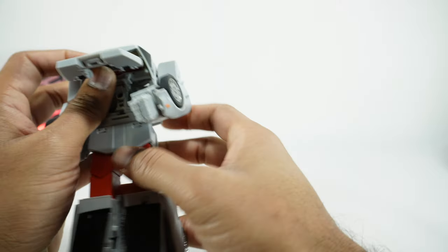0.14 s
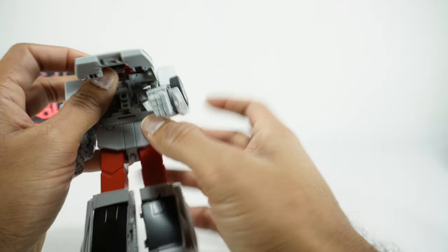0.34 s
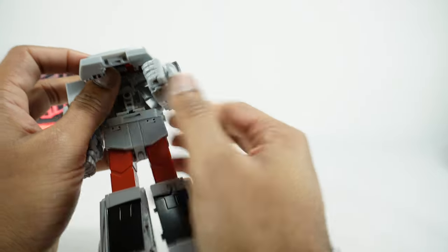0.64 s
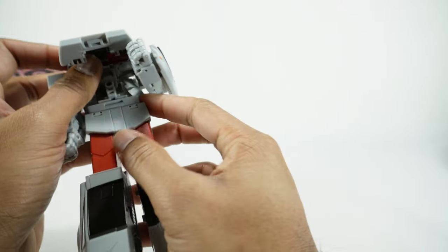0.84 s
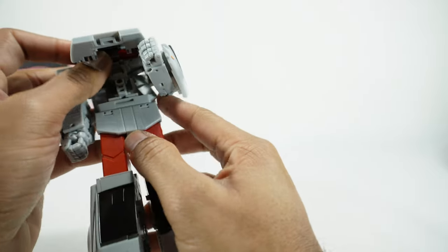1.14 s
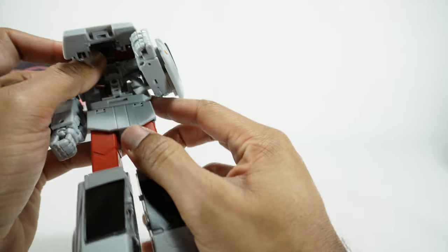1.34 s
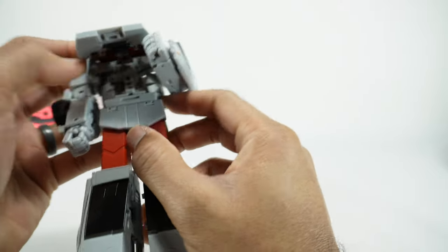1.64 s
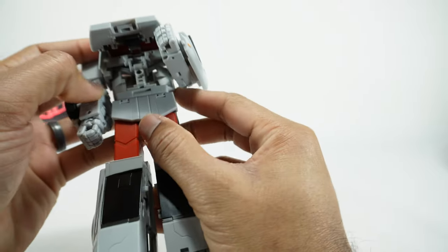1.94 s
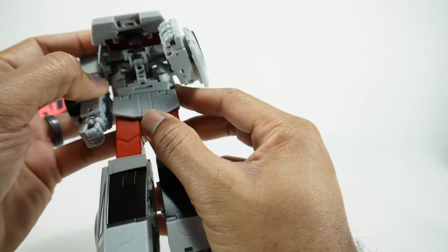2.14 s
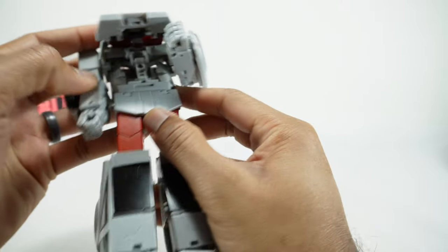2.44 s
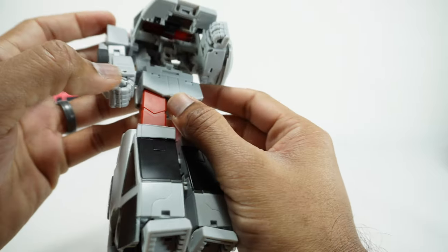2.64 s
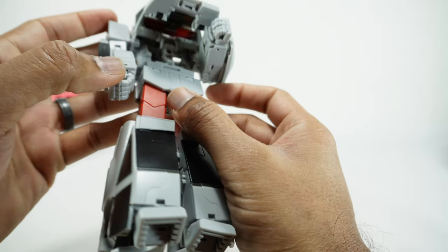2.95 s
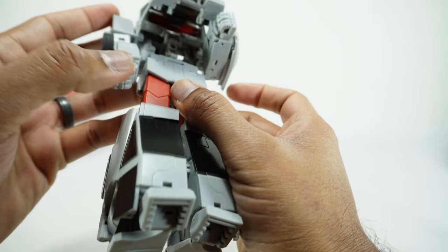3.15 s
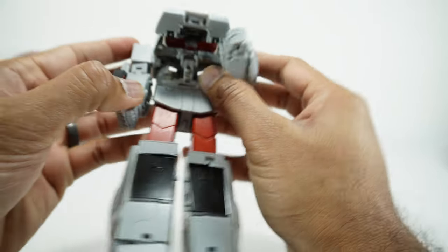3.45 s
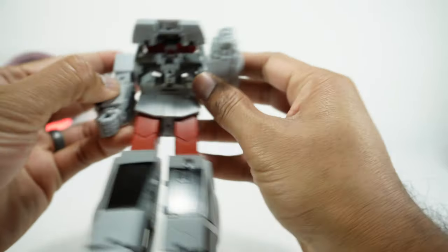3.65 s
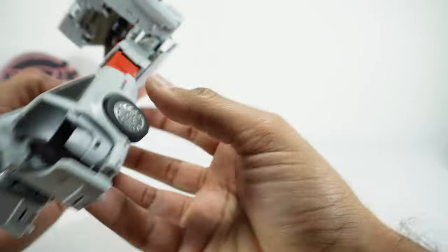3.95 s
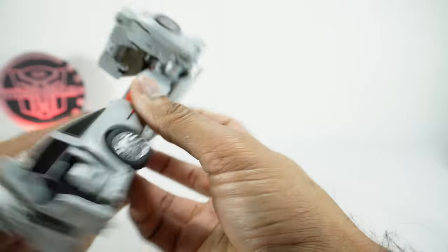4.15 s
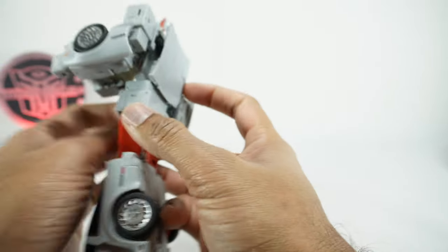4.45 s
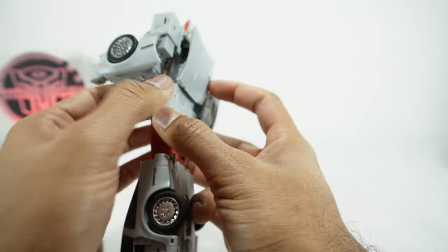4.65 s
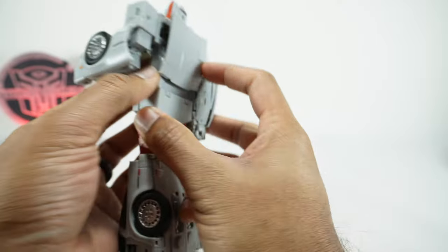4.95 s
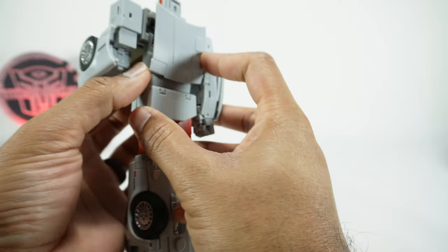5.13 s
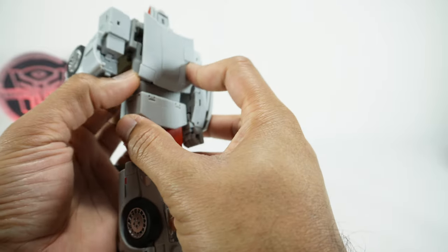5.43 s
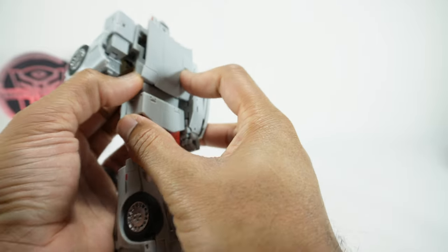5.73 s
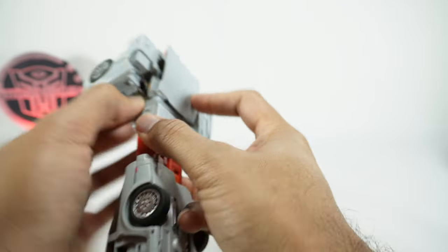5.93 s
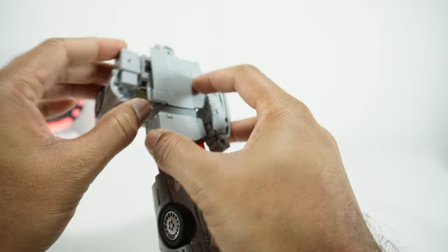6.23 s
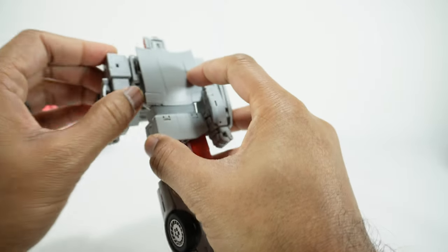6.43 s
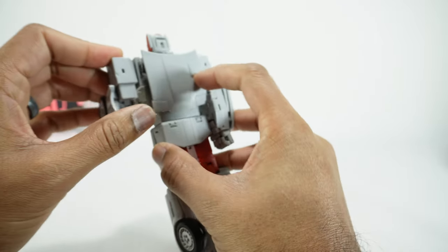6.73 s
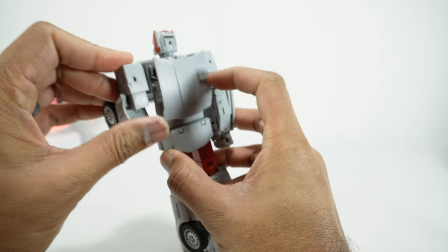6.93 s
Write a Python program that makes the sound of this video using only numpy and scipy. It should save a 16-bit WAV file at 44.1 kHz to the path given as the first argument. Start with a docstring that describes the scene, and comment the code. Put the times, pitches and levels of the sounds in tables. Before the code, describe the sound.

A hard hollow plastic toy is folded by hand, very close to the microphone in a small still room with a soft steady hush. A few light clicks come in the first 0.4 s, then a bright, dense chatter of snaps and scrapes from 0.57 to 1.0 s. It falls quiet, with small clicks around 1.45 and 1.8 s. Between 2.07 and 2.36 s five tiny ratchet ticks sound, then faint handling. A duller knock and scrape arrive at 3.5 s; rapid clicks gather at 3.9 s and culminate in the loudest hard snap at 4.13 s, with more clacks until 4.35 s. One crisp click stands out at 4.83 s. Afterwards come only sparse faint ticks, with thin bright clicks near 5.97 and 6.17 s. Soft skin rubbing and low hand rumble follow the effort throughout. A dull low bump lands at 7.0 s.

```python
"""Folding a hard plastic toy figure

Two hands fold the figure close to a microphone in a small room. Tabs and joints snap, chatter and slide:
each contact is an impulse or stick-slip noise, filtered by the hollow shell and the touched part's own note.
A small ratchet ticks as decaying sines. The effort of the hands drives noise for rubbing and rumble, and
the ticking of loose parts; low damped modes make a dull bump at the end, over the hush of the room."""
import sys
import numpy as np
from scipy import signal
from scipy.fft import rfft, irfft
from scipy.io import wavfile
from scipy.ndimage import uniform_filter1d

SR = 44100
rng = np.random.default_rng(int(sys.argv[2]) if len(sys.argv) > 2 else 0)


def int16_out(signal):
    """Quantize to a 16-bit WAV file."""
    q = np.round(np.clip(np.atleast_2d(signal).T, -1, 1) * 32767)
    wavfile.write(sys.argv[1], SR, q.astype(np.int16))


N = 312436
TIME = np.arange(N) / SR


def amp(db):
    """Decibel law: level to amplitude gain."""
    return 10 ** (np.asarray(db) / 20)


def unit(x):
    """Normalisation of the mean power: scales to rms 1."""
    return x / np.sqrt(np.mean(x ** 2) + 1e-20)


def read(points, hz):
    """Linear interpolation of a table on a log-frequency axis."""
    f, value = np.transpose(points)
    return np.interp(np.log(hz + 1), np.log(f + 1), value)


def add(mix, s, sound):
    """Superposition: mixes a sound into the stereo mix at time s."""
    part = mix[:, max(round(s * SR), 0):][:, :sound.shape[1]]
    part += sound[:, :part.shape[1]]


def colour(x, points):
    """Zero-phase filtering: weights the spectrum by a table of f/Hz, level/dB."""
    hz = np.fft.rfftfreq(x.shape[-1], 1 / SR)
    return irfft(rfft(x) * amp(read(points, hz)), x.shape[-1])


def causal(gain):
    """Minimum phase: the response with this gain that is silent before the blow."""
    log_gain = np.log(gain + 1e-9)
    circle = np.concatenate([log_gain, log_gain[-2:0:-1]])
    return np.exp(np.conj(signal.hilbert(circle)))[:len(gain)]


def spread(mid, side, width_db, corner_hz=4800):
    """Spatial coherence: two close capsules are alike in the bass, further apart for short waves."""
    hz = np.fft.rfftfreq(len(mid), 1 / SR)
    width = amp(width_db) * np.minimum((hz / corner_hz) ** 1.3, 1.45)
    apart = irfft(rfft(side) * width, len(mid))
    return np.array([mid + apart, mid - apart])


# broad spectrum that the shell radiates, weak below its first modes: f/Hz, relative level/dB
SHELL_SPECTRUM = [(60, -45.5), (480, -17), (750, -20), (1050, -11), (1450, -7.5), (1780, 3.5), (2250, 2.5),
                  (3100, 5.5), (4400, 1.5), (6200, -2.5), (8200, -7), (9800, -19), (12500, -27.5),
                  (16000, -43)]


def radiated(hz, tilt_db, note_hz, note_db, pivot_hz=4000, lowest_hz=1500, highest_hz=10500, note_share=0.095):
    """Source-filter principle: shell spectrum, tilted by contact hardness, plus the part's resonance."""
    tilt = tilt_db * np.log2(np.clip(hz, lowest_hz, highest_hz) / pivot_hz)  # dB per octave
    note = note_db / (1 + ((hz / note_hz - 1) / note_share) ** 2)
    return amp(read(SHELL_SPECTRUM, hz) + tilt + note)


# modes of the shell, shared by every contact: f/Hz, relative level/dB
SHELL_MODES = [(1760, -3.5), (2070, -2), (2250, -1.5), (2670, -9), (2820, -21.5), (3210, 1), (3500, -4.5),
               (3930, -4), (4515, -0.5), (5570, -2.5), (7860, -6)]


def shell_ring(t, modes_db=-12, crack_db=5, crack_t60=0.012, dense_t60=0.1,
               mode_t60=0.065, mode_hz=2200, scatter_db=4, detune_share=0.0099):
    """Modal superposition: a crack, a dense ring of small parts, and main modes struck at a random spot."""
    hz, db = np.transpose(SHELL_MODES)[:, :, None]
    weight, phase, detune = rng.standard_normal((3, len(hz), 1))
    hz = hz * (1 + detune_share * detune)  # the modes shift as the grip changes
    t60 = mode_t60 * np.sqrt(mode_hz / hz)  # plastic damps high modes sooner
    decay = amp(db + scatter_db * weight - 60 * t / t60)
    modes = decay * np.sin(2 * np.pi * (hz * t + phase))
    crack = amp(crack_db - 60 * t / crack_t60)
    dense = .5 * amp(-60 * t / dense_t60)
    return rng.standard_normal(len(t)) * (crack + dense) + amp(modes_db) * modes.sum(0)


def click(db, tilt_db, note_hz, note_db, chatter_s, size=4096, slips_per_s=2500, first_s=0.0047,
          dispersion=0.0702, slip_db=2, fade_s=0.0084, kept=0.41):
    """Impulse excitation: a snap, or a quick swelling run of tiny slips, rings the shell."""
    t, hz = np.arange(size) / SR, np.fft.rfftfreq(size, 1 / SR)
    swell = np.sin(np.pi * np.minimum(t / (chatter_s + 1e-9), 1))
    slips = amp(slip_db) * swell * rng.standard_normal(size) * (rng.random(size) < slips_per_s / SR)
    slips[0] = 1
    rings = np.array([shell_ring(t), shell_ring(t)])  # mid, side
    rings[0, 0] += abs(rings[0]).max()  # the first wavefront reaches both capsules alike
    blow = rfft(signal.fftconvolve(rings, slips[None], axes=1)[:, :size])
    # flatten, so that the shell sets the broad colour
    blow /= np.sqrt(uniform_filter1d(abs(blow[0]) ** 2, size=70) + 1e-12)
    # bending waves: the treble crosses the shell first
    blow *= np.exp(-2j * np.pi * dispersion * np.sqrt(hz))
    early = irfft(blow * causal(radiated(hz, tilt_db, note_hz, note_db)))
    late = irfft(blow * causal(radiated(hz, kept * tilt_db, note_hz, kept * note_db)))
    # the struck part's own colour soon gives way to the shell's
    local = np.exp(-(np.maximum(t - chatter_s, 0) / fade_s) ** 2)
    ending = np.cos(np.pi / 2 * np.minimum(t / t[-1], 1)) ** 2  # the last of the ring fades smoothly to silence
    mid, side = ending * (local * early + (1 - local) * late)
    attack_rms = np.sqrt(np.mean(mid[t < first_s + chatter_s] ** 2))
    return amp(db) / attack_rms * spread(mid, side, width_db=-13.0)


# the parts that get touched: f/Hz of the own note, its peak level/dB above the shell spectrum
LEG = (1340, 8.4)
BODY = (2080, 2.9)
PANEL = (2285, 16.5)
CHEST = (2600, 9.2)
FLAP = (3020, 13.4)
HINGE = (3190, 4.6)
JOINT = (3146, 15.2)
ARM = (4200, 17.2)
PEG = (4560, 11.6)
TAB = (6120, 17.5)
PIN = (7250, 10.4)
LATCH = (13700, 19)
# parts snapping home or knocking together:
# t/s, relative level/dB, brightness/dB per octave, part, chatter length/s
CONTACTS = [ (0.085, -44.5, 4, PEG, 0.0011), (0.1159, -36.5, 0, JOINT, 0),
            (0.1774, -51.5, 1.5, BODY, 0.002), (0.3793, -46.5, 6.5, HINGE, 0),
            (0.3905, -45, 0, BODY, 0.0065), (0.5757, -29.5, 9, PIN, 0.0013),
            (0.585, -31.5, 13.5, HINGE, 0.0025), (0.5885, -35, -2, CHEST, 0.0059),
            (0.601, -35.5, 21, PIN, 0.001), (0.6093, -26.5, 4, HINGE, 0.0036),
            (0.67, -35.5, 1.5, PIN, 0.0053), (0.675, -34, 10, HINGE, 0.0028),
            (0.7055, -28.5, 8.5, JOINT, 0.00025), (0.7078, -31, 8, HINGE, 0.003),
            (0.7265, -30, 4.5, PIN, 0), (0.7533, -35, -7, FLAP, 0), (0.834, -39.5, -2, FLAP, 0),
            (0.862, -39.5, 0.5, BODY, 0.00081), (0.955, -38, 7, PEG, 0.0079),
            (0.9674, -36, 10, HINGE, 0.0037), (0.978, -38, 6, HINGE, 0.005),
            (1.4395, -40.5, -1.5, PEG, 0.0029), (1.4417, -35.5, 2.5, BODY, 0.0018),
            (1.4536, -42, 4, JOINT, 0), (1.495, -46, 0.5, PEG, 0.0042), (1.581, -53, -4.5, BODY, 0.0033),
            (1.791, -49, -0.5, JOINT, 0.01), (1.817, -40, 5.5, FLAP, 0.00019),
            (2.0742, -50, 1, HINGE, 0.00079), (2.597, -50.5, -3.5, CHEST, 0.002),
            (2.65, -43, -2, FLAP, 0.0028), (3.227, -51.5, 1.5, BODY, 0.0035),
            (3.348, -44.5, 4, FLAP, 0.016), (3.432, -47.5, 8, PANEL, 0.0062),
            (3.5061, -32, -9, BODY, 0.00043), (3.51, -32, -5, BODY, 0.003), (3.519, -33, -4, PANEL, 0.0058),
            (3.5324, -32, 10, FLAP, 0), (3.561, -45, -14, BODY, 0.0014), (3.693, -44, 2.5, HINGE, 0.0025),
            (3.734, -48.5, 0.5, BODY, 0.012), (3.7558, -40.5, 3, HINGE, 0.008),
            (3.7853, -33.5, 1, PANEL, 0.0044), (3.901, -25.5, 2.5, JOINT, 0.0025),
            (3.916, -30.5, 0, HINGE, 0.0083), (3.9337, -28, 1.5, HINGE, 0.00044),
            (3.943, -27, 5.5, PEG, 0.0051), (3.957, -26, 5, PEG, 0.0036), (3.9626, -25, 3, PEG, 0),
            (4.0966, -37, 1, HINGE, 0.008), (4.1074, -26, 1, HINGE, 0), (4.1276, -24.5, -2.5, HINGE, 0),
            (4.1336, -14.5, 4.5, CHEST, 0), (4.14, -19.5, 1, CHEST, 0.0017),
            (4.1474, -22.5, -3, PANEL, 0.0015), (4.2578, -21.5, 3, FLAP, 0.00097),
            (4.261, -24, 0, PANEL, 0.0019), (4.299, -30, 0, HINGE, 0.0036),
            (4.306, -29, 2.5, JOINT, 0.0026), (4.3159, -30, 0, HINGE, 0.00061),
            (4.321, -27, 2, PEG, 0.0051), (4.358, -39.5, 0.5, BODY, 0.00022),
            (4.4215, -42.5, -6.5, HINGE, 0.00082), (4.574, -40.5, 1.5, HINGE, 0.0033),
            (4.7382, -40.5, 0.5, PEG, 0), (4.747, -39.5, 3.5, HINGE, 0.00095),
            (4.7756, -44, 1.5, PEG, 0.008), (4.8273, -27.5, 2.5, TAB, 0), (4.878, -44.5, 5, JOINT, 0.0039),
            (4.902, -50.5, 3, PANEL, 0.0056), (4.987, -51.5, -1.5, HINGE, 0.0013),
            (5.44, -45.5, -2, HINGE, 0.005), (5.501, -50, -2.5, BODY, 0.012),
            (5.5578, -49, -7, BODY, 0.0007), (5.6015, -44.5, -1.5, BODY, 0.0043),
            (5.7735, -54, -3.5, FLAP, 0.00068), (5.858, -51.5, -2, HINGE, 0.006),
            (5.9424, -45.5, 8, PEG, 0), (5.973, -38.5, 10, LATCH, 0.0037), (6.082, -52.5, 4, PEG, 0.0052),
            (6.1642, -36.5, 12.5, JOINT, 0), (6.176, -34.5, 2, LATCH, 0.0022),
            (6.2294, -46.5, -0.5, PEG, 0.0012), (6.315, -52.5, 2, JOINT, 0.0037),
            (6.379, -49, 4, PEG, 0.01), (6.591, -53.5, -3.5, BODY, 0.008), (6.683, -48, -5, ARM, 0.0088),
            (6.706, -49.5, -6.5, ARM, 0.014), (6.9474, -44, -4.5, BODY, 0.0072)]


def clicks(gain_db=0.5):
    """Impact sound: the clear contacts of the parts."""
    out = np.zeros((2, N))
    for s, db, tilt_db, part, chatter_s in CONTACTS:
        add(out, s, click(db, tilt_db, *part, chatter_s))
    return amp(gain_db) * out


def friction(count, grains_per_s, spread_db, patchy_db=3.5):
    """Stick-slip: grains of uneven size find resonances that shift as the contact point moves."""
    grains = rng.standard_normal(count) * amp(spread_db * np.minimum(rng.exponential(1, count), 3.5))
    grains *= rng.random(count) < grains_per_s / SR
    z = signal.stft(np.pad(grains, (0, 512)), nperseg=512, noverlap=384)[2]
    # smooth the random patches over frequency, then over time
    patches = uniform_filter1d(rng.standard_normal(z.shape), size=3, axis=0)
    patches = uniform_filter1d(patches, size=12, axis=1)
    return unit(signal.istft(z * amp(patchy_db * unit(patches)), noverlap=384)[1][:count])


# parts sliding on each other:
# start t/s, strongest t/s, end t/s, relative level/dB, brightness/dB per octave, part
SLIDES = [ (0.24, 0.269, 0.28, -48.5, 2, PANEL), (0.27, 0.295, 0.35, -49.5, 3, HINGE),
          (0.519, 0.537, 0.59, -51.5, 2, HINGE), (0.563, 0.584, 0.66, -33.5, 2, LEG),
          (0.663, 0.718, 0.73, -33.5, -0.5, BODY), (0.732, 0.757, 0.84, -45.5, -9, CHEST),
          (0.949, 0.969, 1, -37.5, -6, BODY), (1.112, 1.144, 1.21, -56.5, 1.5, PEG),
          (1.22, 1.303, 1.41, -54.5, -2, PANEL), (1.306, 1.33, 1.45, -54, 10, PEG),
          (1.6, 1.628, 1.735, -52, 7, HINGE), (1.784, 1.787, 1.97, -55, 1.5, HINGE),
          (2.72, 2.742, 2.8, -59.5, -1, JOINT), (2.98, 3.056, 3.22, -60.5, -3, HINGE),
          (3.205, 3.218, 3.42, -55, -1, HINGE), (3.441, 3.537, 3.556, -36.5, 0, LEG),
          (3.9, 3.948, 3.95, -36.5, -2, BODY), (4.055, 4.12, 4.17, -39, -1, PANEL),
          (4.132, 4.158, 4.18, -29, -3, PANEL), (4.189, 4.227, 4.28, -34, 3, HINGE),
          (4.466, 4.483, 4.51, -49.5, -4, BODY), (5.904, 5.963, 5.96, -47, 2, CHEST),
          (6.141, 6.186, 6.21, -41.5, -1, HINGE), (6.31, 6.393, 6.5, -56.5, 6, PEG),
          (6.579, 6.656, 6.82, -57.5, -7, ARM), (6.9, 6.944, 7.05, -52.5, -4.5, ARM)]


def slides(grains_per_s=7000, spread_db=2.0):
    """Friction-driven resonance: tight joints scrape and squeak, swelling and easing as they turn."""
    out = np.zeros((2, N))
    for start, top, end, db, tilt_db, part in SLIDES:
        t = np.arange(start, max(end, start + .01), 1 / SR)
        hz = np.fft.rfftfreq(len(t), 1 / SR)
        grit = np.array([friction(len(t), grains_per_s, spread_db) for _ in range(2)])
        mid, side = unit(irfft(rfft(grit) * radiated(hz, tilt_db, *part), len(t)))
        swell = np.interp(t, [start, top, end], [0, 1, 0])
        add(out, start, amp(db) * swell * spread(mid, side, width_db=-16))
    return out


# a small ratchet passes its teeth: t/s, relative level/dB
RATCHET_TEETH = [(2.0747, -46), (2.139, -42.5), (2.1895, -43), (2.294, -41), (2.362, -45.5)]
# modes of the pawl: f/Hz, relative level/dB, t60/s
PAWL_MODES = [(1903, 1.5, 0.027), (2900, -9, 0.014), (3600, -9, 0.018)]


def ratchet(rise_s=0.00087, shell_db=-13):
    """Plucked resonator: each tooth plucks a springy pawl, which rings and stirs the shell a little."""
    out, t = np.zeros((2, N)), np.arange(SR // 10) / SR
    pawl = sum(amp(db - 60 * t / t60) * np.sin(2 * np.pi * hz * t) for hz, db, t60 in PAWL_MODES)
    pawl *= 1 - np.exp(-t / rise_s)
    for s, db in RATCHET_TEETH:
        add(out, s, amp(db) * pawl[None])
        add(out, s, click(db + shell_db, -11, *BODY, 0))
    return out


# how hard the hands work: t/s, level/dB, taken relative to the usual effort
EFFORT = [(0, -54), (0.2, -59.5), (0.48, -66), (0.6, -54.5), (0.8, -55), (1.08, -62.5), (1.87, -62),
          (2.3, -72), (2.63, -57.5), (2.88, -73), (3.18, -65.5), (3.4, -53.5), (3.65, -58.5), (4.3, -49),
          (4.64, -61.5), (4.8, -54.5), (5.2, -70.5), (5.7, -66), (6.15, -57), (6.5, -65.5), (7.08, -64.5)]


def effort(share=1, usual_db=-60):
    """Envelope control: gain at every sample of a sound that follows this share of the effort in dB."""
    return amp(share * (np.interp(TIME, *np.transpose(EFFORT)) - usual_db))


def loose_parts(level_db=-61, ticks_per_s=20, spread_db=1.2, tilt_db=1.0, chatter_s=0.0093,
                effort_share=0.7, count=240):
    """Random point process: loose parts tick faintly, louder and more often as the hands work harder."""
    out, push = np.zeros((2, N)), effort(effort_share)
    parts = [BODY, PANEL, HINGE, JOINT, PEG]
    slot_s = N / SR / count  # at most one tick per slot
    for k, (place, chance, size, drag) in enumerate(rng.random((count, 4))):
        at = int((k + place) / count * N)
        if chance < ticks_per_s * push[at] * slot_s:
            db = level_db + spread_db * min(-np.log(1 - size), 2.5)
            tick = click(db, tilt_db, *parts[k % len(parts)], drag * chatter_s)
            add(out, at / SR, push[at] * tick)
    return out


# skin on plastic: f/Hz, relative level/dB
RUB_COLOUR = [(500, -11), (1200, -2), (1900, 3.5), (3200, 2), (4600, 0), (7500, -8.5), (10000, -14),
              (16000, -25)]
# hollow between the hands: f/Hz, relative level/dB
PALM_COLOUR = [(200, -34), (440, 1), (620, -2.5), (1000, -32), (3000, -47.5)]


def fingers(rub_db=-60.5, grains_per_s=7000, spread_db=2.5, palm_db=-73):
    """Friction noise: skin rubs softly on plastic; the palms add a dull, uneven brushing."""
    mid, side = (unit(colour(friction(N, grains_per_s, spread_db), RUB_COLOUR)) for _ in range(2))
    palms = amp(palm_db) * unit(colour(friction(N, grains_per_s, spread_db), PALM_COLOUR))
    return amp(rub_db) * effort() * spread(mid, side, width_db=-6.5) + palms


# rumble of the moving hands: f/Hz, relative level/dB
RUMBLE_COLOUR = [(20, -21.5), (38, -5), (52, -0.5), (75, -7), (120, -11), (200, -11), (400, -22.5),
                 (1000, -42.5)]
# the hands shift their grip with a soft thud: t/s, peak level/dB of the swell
REGRIPS = [(0.11, -58), (2.5, -66), (3.53, -56), (4.56, -65), (4.95, -67), (6.16, -59)]


def rumble(level_db=-70.0, effort_share=0.63, swell_s=0.027):
    """Amplitude-modulated noise: low rumble of the moving hands, swelling at each new grip."""
    level = amp(level_db) * effort(effort_share)
    for s, db in REGRIPS:
        age = np.maximum(TIME - s, 0) / swell_s
        level = level + amp(db) * age * np.exp(1 - age)
    return level * unit(colour(rng.standard_normal(N), RUMBLE_COLOUR))


# modes of the dull bump: f/Hz, relative level/dB, t60/s
BUMP_MODES = [(52, -24.5, .2), (87, 12, 0.12), (141, 8.5, 0.1), (161, -2.5, 0.17)]


def bump(at_s=7.001, gain_db=-36.5, rise_s=0.0071):
    """Damped modes: one soft bump with a gradual onset."""
    t = np.maximum(TIME - at_s, 0)
    modes = sum(amp(db - 60 * t / t60) * np.sin(2 * np.pi * hz * t) for hz, db, t60 in BUMP_MODES)
    return amp(gain_db) * modes * (1 - np.exp(-t / rise_s))


def handling():
    """High-pass response: rumble and bump through a microphone that passes no deep bass."""
    low_cut = signal.butter(3, 42, "high", fs=SR, output="sos")  # order, Hz
    return signal.sosfilt(low_cut, rumble() + bump())


# decay of the room: f/Hz, t60/s
ROOM_T60 = [(1000, 0.34), (7000, 0.18), (15000, 0.29)]


def room(x, delay_s=0.016):
    """Diffuse-field decay: a delayed noise tail, each band dying at its own speed."""
    taps = rng.standard_normal((2, SR // 2))
    hz, t, z = signal.stft(taps, SR, nperseg=256)
    tail = signal.istft(z * amp(-60 * t / read(ROOM_T60, hz)[:, None]), SR)[1]
    tail *= np.arange(tail.shape[1]) / SR > delay_s
    return signal.fftconvolve(x.mean(0)[None], tail / np.linalg.norm(tail[0]), axes=1)[:, :N]


# still room: f/Hz, relative level/dB
AIR_COLOUR = [(25, -36), (45, -15), (185, -3), (300, -7.5), (480, -8), (750, -11), (5000, -18.5),
              (6560, -23.5), (16000, -30)]
# likeness of left and right in the still room: f/Hz, correlation (1 = identical)
AIR_LIKENESS = [(60, 0.89), (150, 0.71), (350, 0.58), (2000, 0.32), (5000, 0.099), (12000, .2)]


def air(level_db=-62):
    """Partly coherent noise: steady hush of the room and the microphone."""
    left, other = rfft(rng.standard_normal((2, N)))
    same = np.clip(read(AIR_LIKENESS, np.fft.rfftfreq(N, 1 / SR)), -1, 1)
    right = same * left + np.sqrt(1 - same ** 2) * other
    pair = irfft(np.array([left, right]), N)
    return amp(level_db) * unit(colour(pair, AIR_COLOUR))


def scene(room_db=-20, left_db=0.3):
    """Superposition: the toy, slightly left of centre, in its room."""
    toy = clicks() + slides() + ratchet() + loose_parts() + fingers()
    toy = toy * amp([[left_db], [-left_db]])
    return toy + amp(room_db) * room(toy) + handling() + air()


def record(dry, edge_hz=15900):
    """Band limitation: a linear-phase low-pass removes the highest treble."""
    low_pass = signal.firwin(511, edge_hz, window=("kaiser", 9), fs=SR)
    return signal.oaconvolve(dry, low_pass[None], "same")


dry = scene()
out = record(dry)
int16_out(out)
```